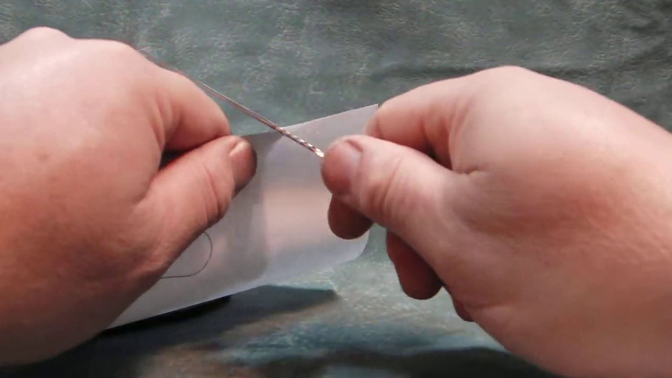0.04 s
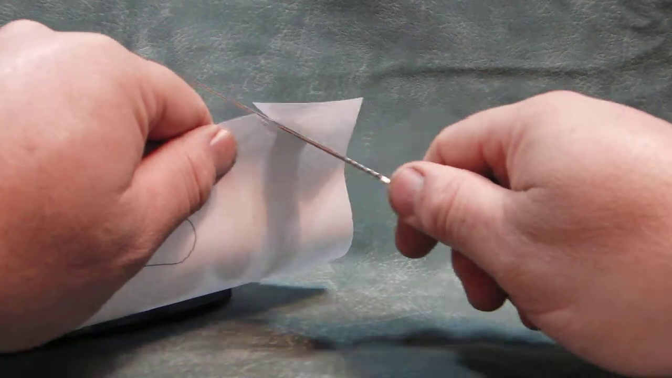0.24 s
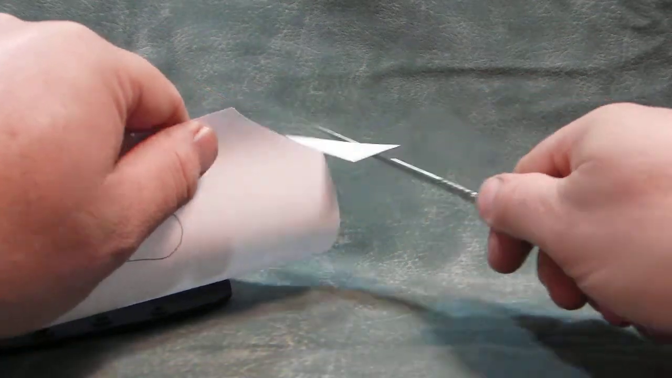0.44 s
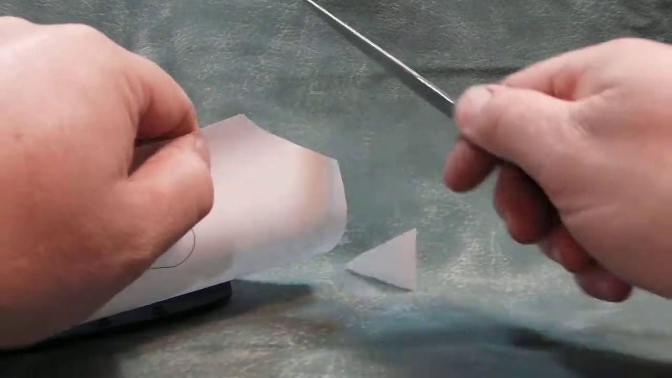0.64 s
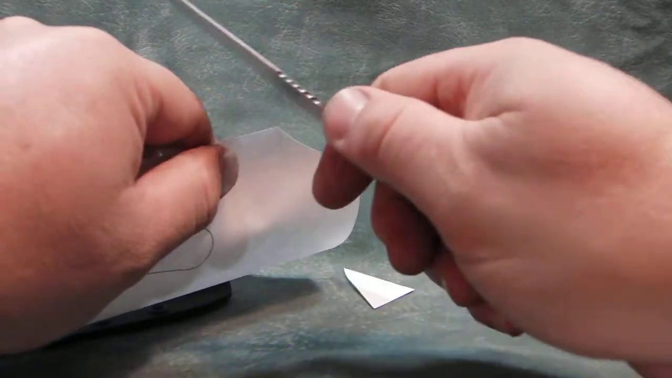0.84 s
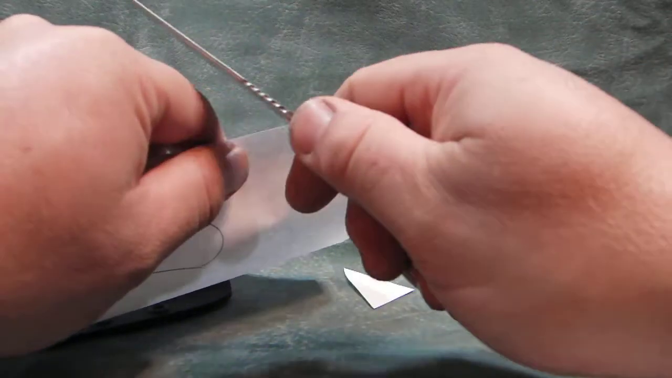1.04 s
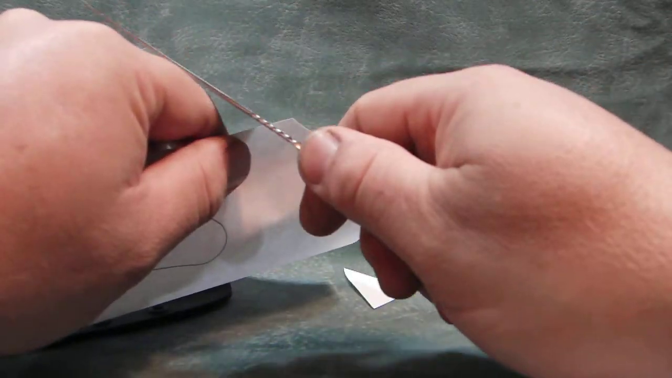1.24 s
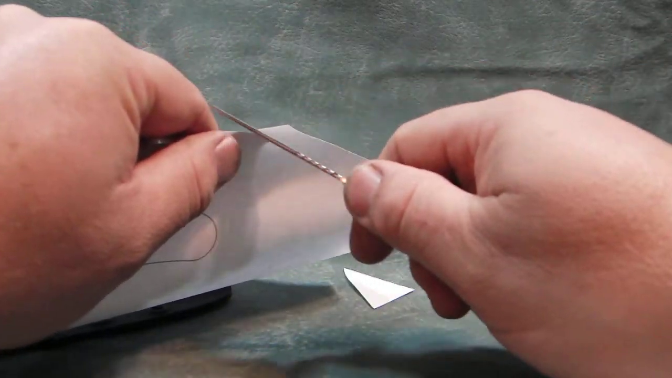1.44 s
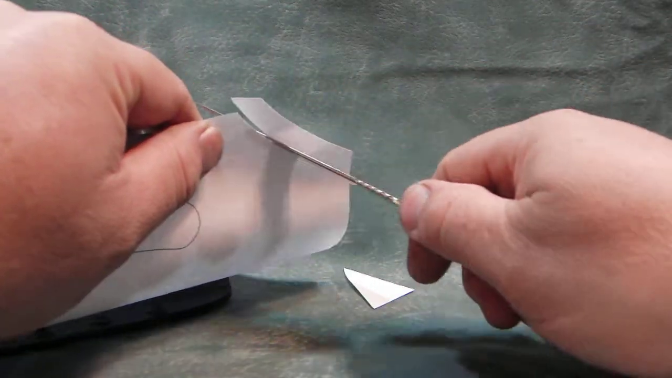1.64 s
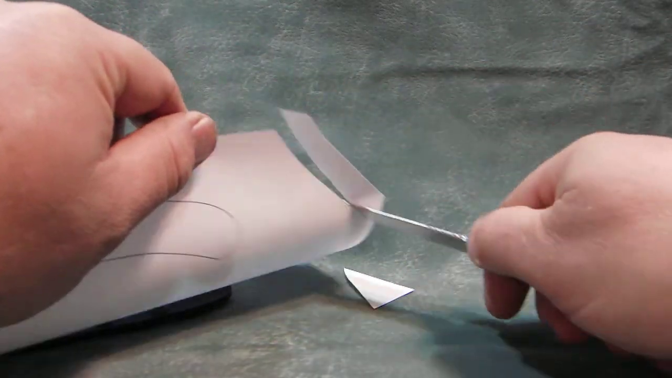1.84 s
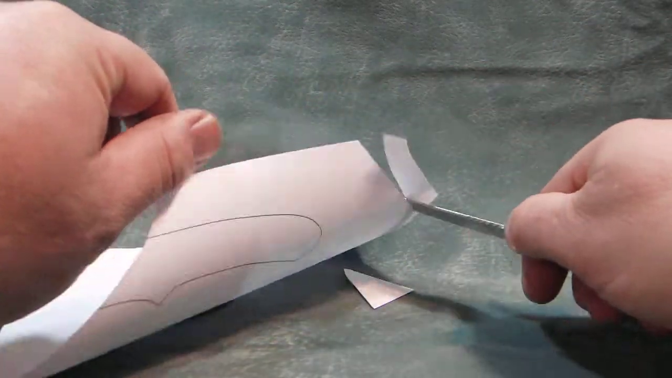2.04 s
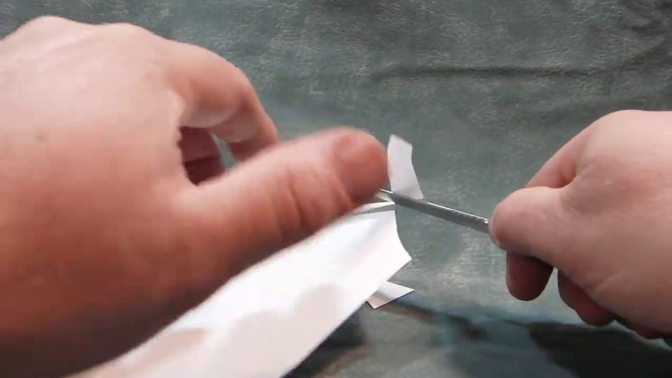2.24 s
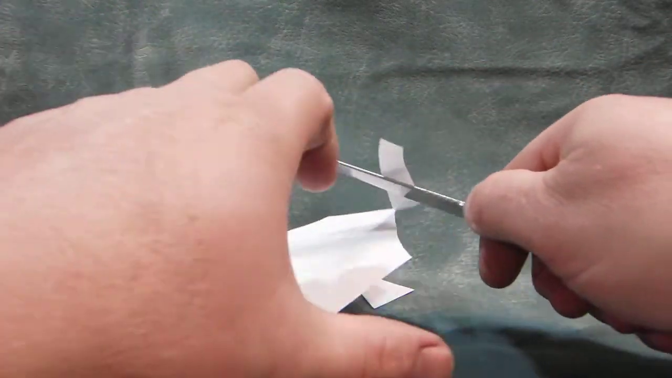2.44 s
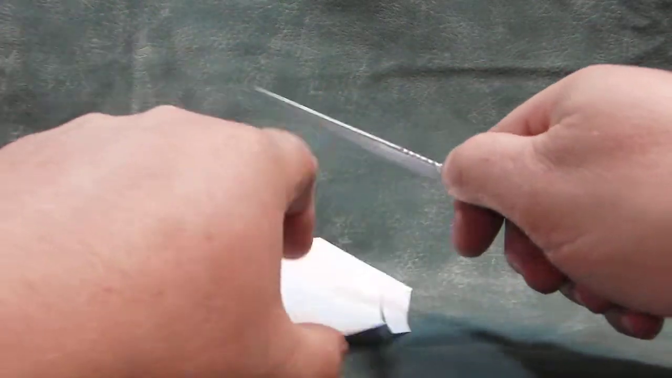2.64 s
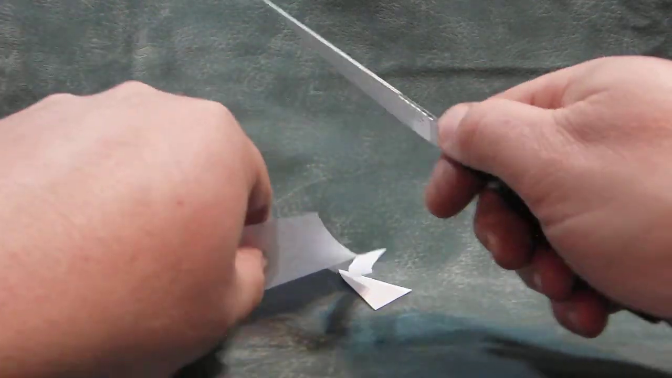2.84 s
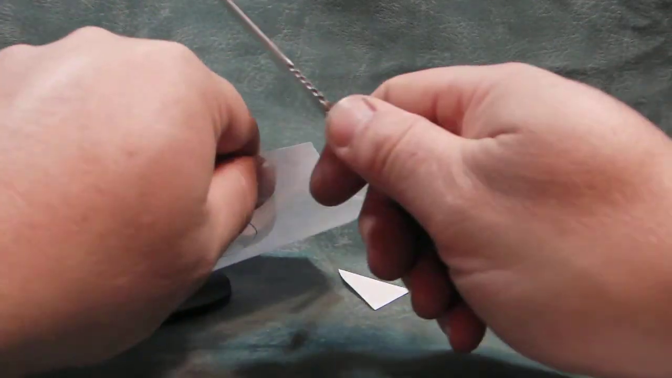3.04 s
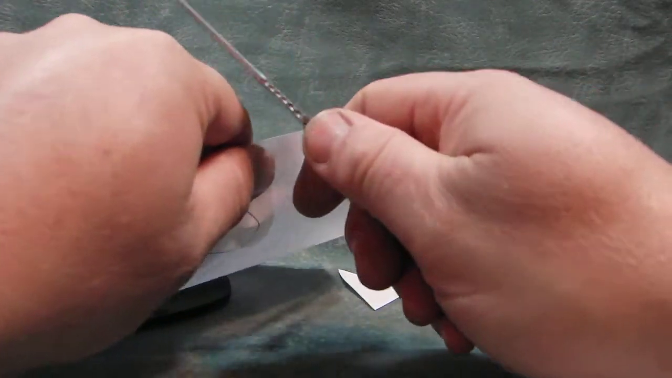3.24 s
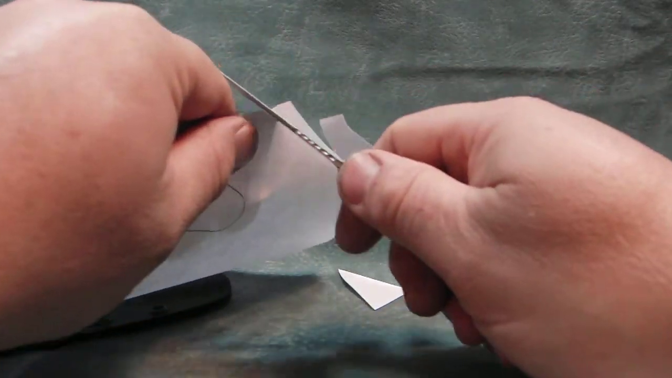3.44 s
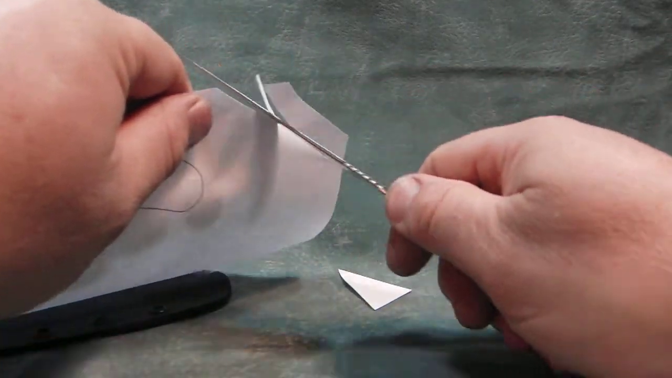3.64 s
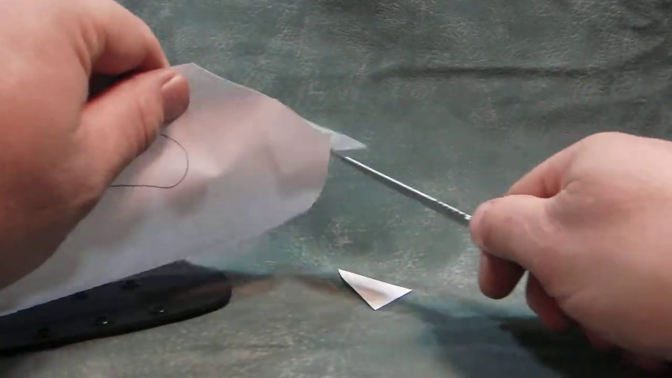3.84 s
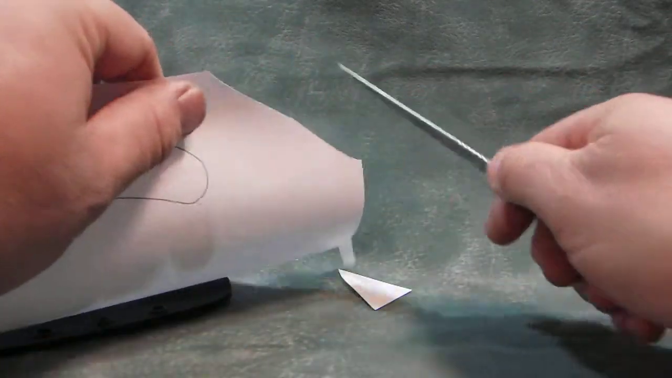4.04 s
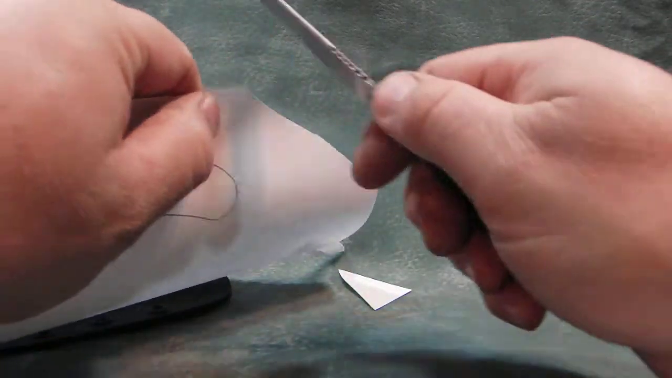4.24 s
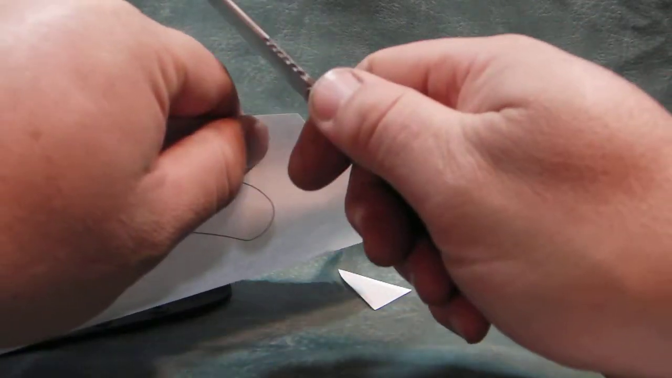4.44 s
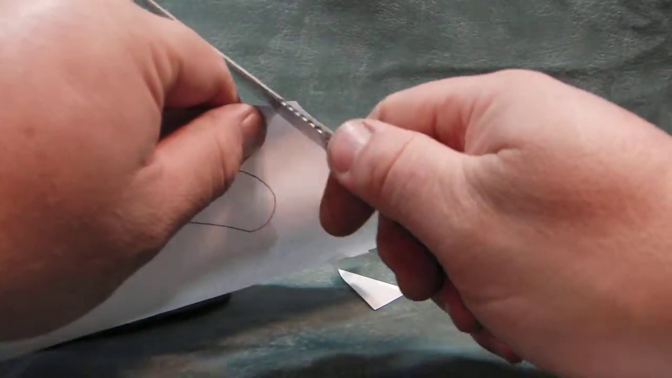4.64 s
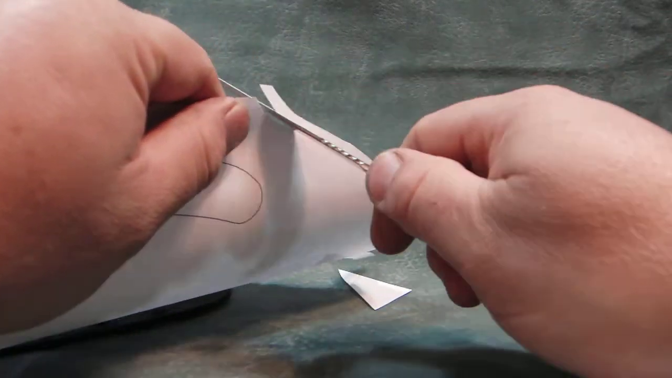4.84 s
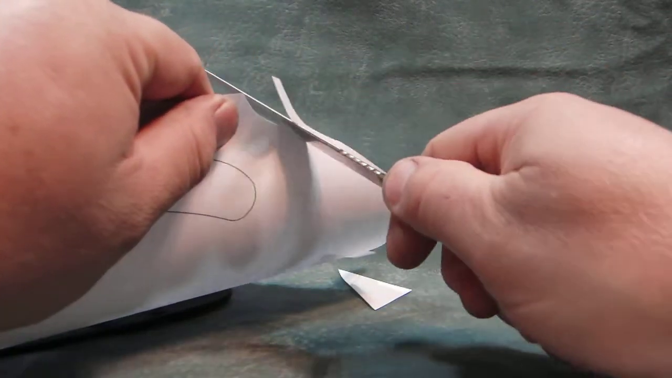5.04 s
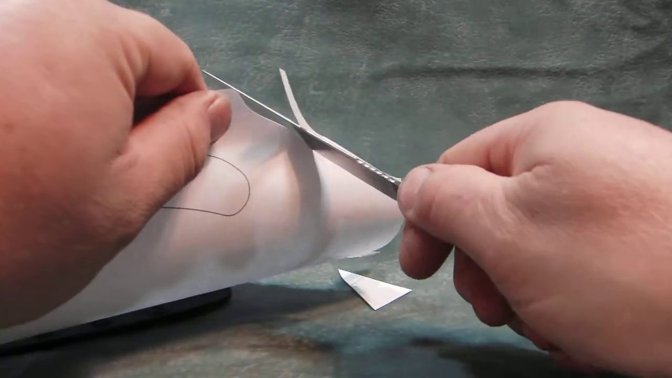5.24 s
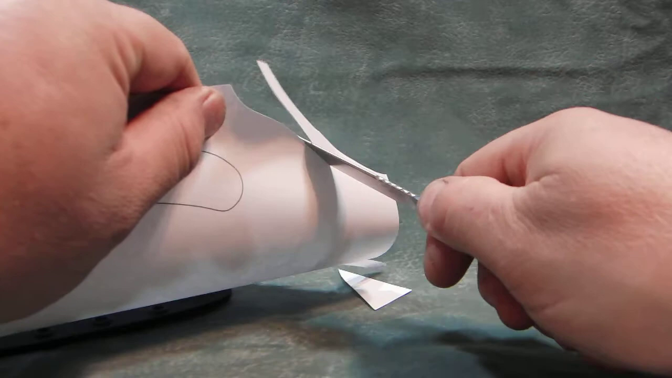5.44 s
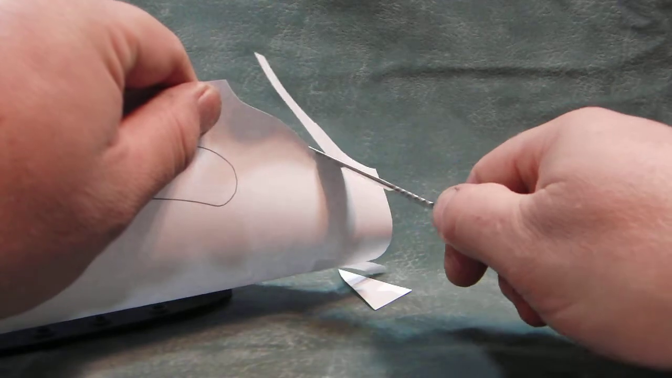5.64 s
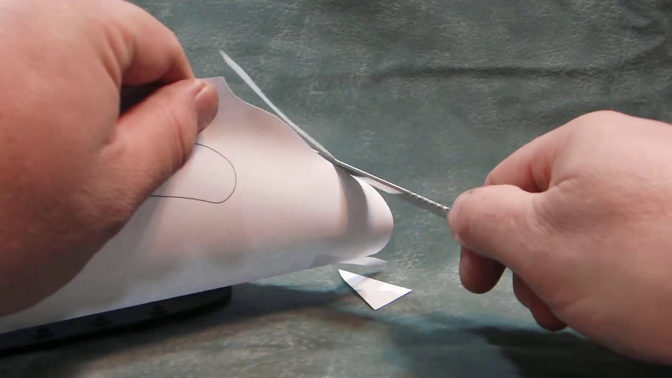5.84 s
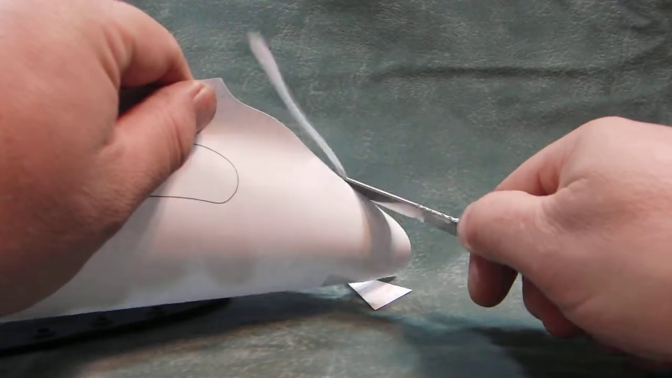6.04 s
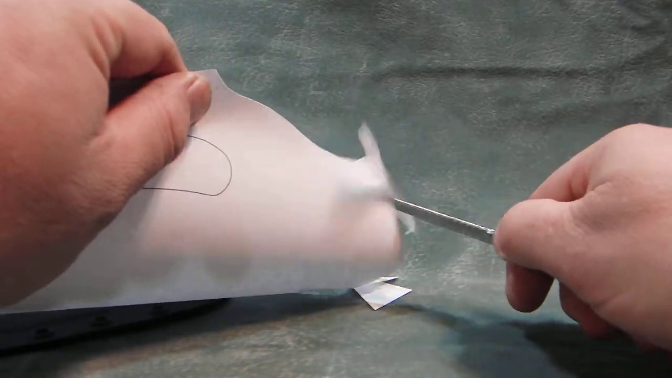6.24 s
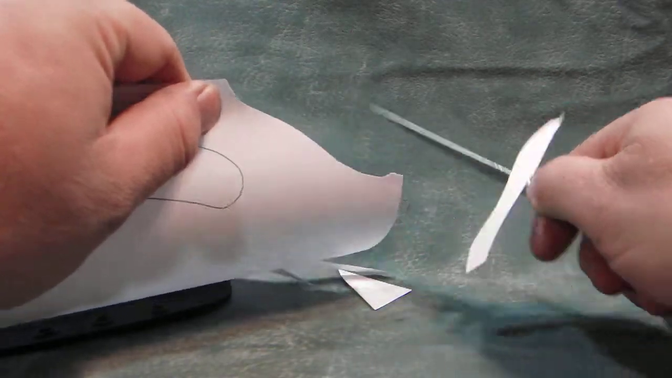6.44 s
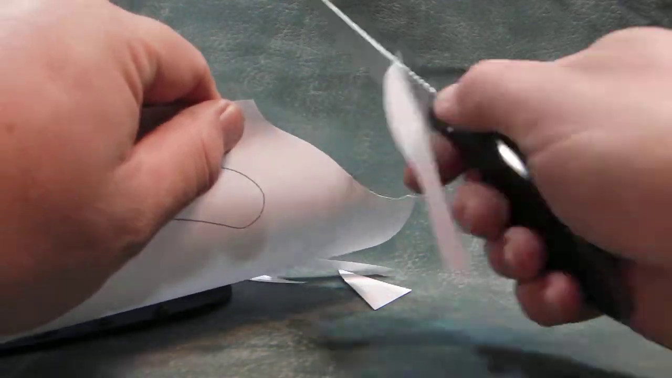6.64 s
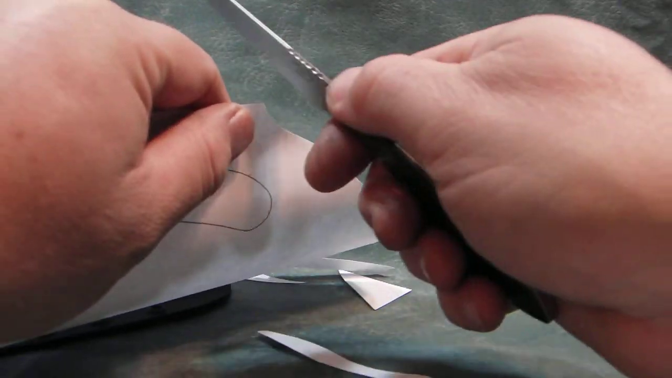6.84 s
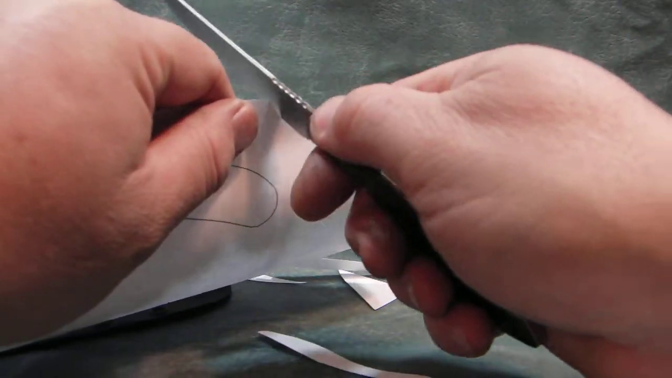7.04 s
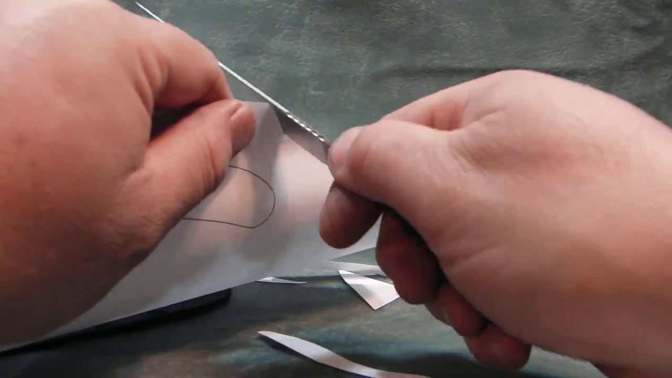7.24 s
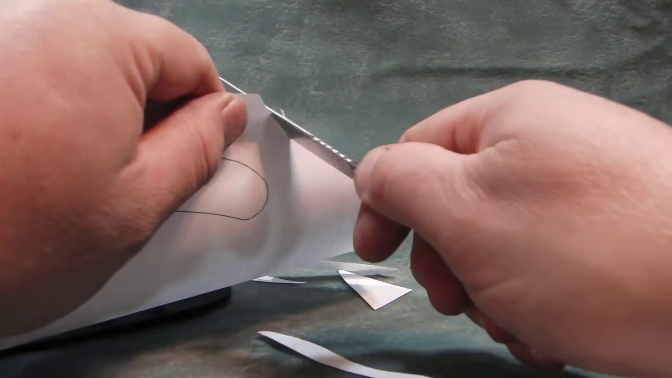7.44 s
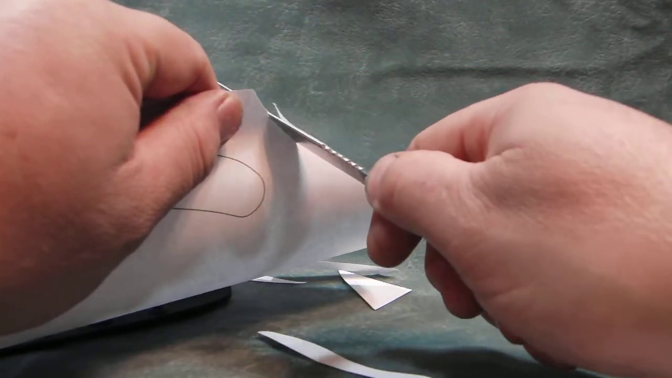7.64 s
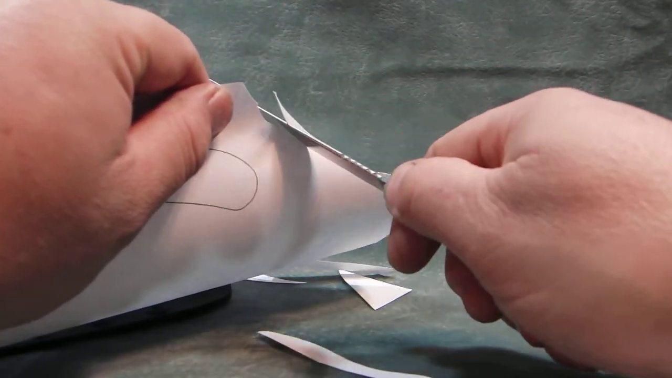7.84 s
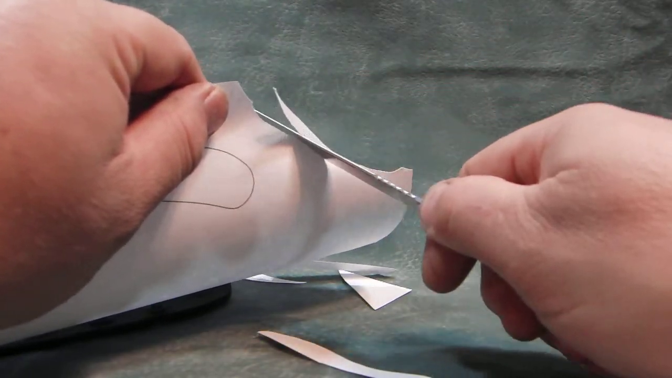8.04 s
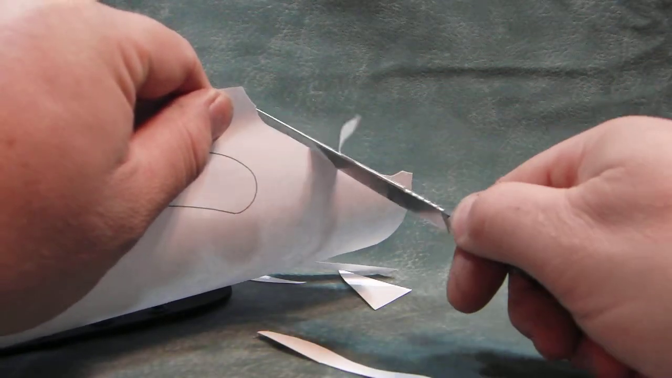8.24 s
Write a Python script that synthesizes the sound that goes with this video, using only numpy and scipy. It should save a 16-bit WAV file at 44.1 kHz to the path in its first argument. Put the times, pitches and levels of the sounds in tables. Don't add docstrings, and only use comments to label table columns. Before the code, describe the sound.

Close, dry paper cutting: fluttering, tearing swishes of a knife through a sheet, sharp fibre ticks, soft handling rustle, faint room hiss.

```python
import sys
import numpy as np
from scipy import signal
from scipy.fft import rfft, irfft, next_fast_len
from scipy.io import wavfile

SR = 44100
rng = np.random.default_rng(int(sys.argv[2]) if len(sys.argv) > 2 else 0)


def elevation(decibels):
    levels = np.asarray(decibels, float)
    return 10 ** (levels / 20)


def master(y):
    cut = np.clip(np.atleast_2d(y).T, -1, 1)
    pcm = np.round(cut * 32767)
    wavfile.write(sys.argv[1], SR, pcm.astype(np.int16))


N = 366471

ZONE_TOPS_HZ = [280, 1300, 2700, 5000, 7860]


def paper():
    cut = zone_gains(pushes(), edge_s=0.0013)
    rub = zone_gains(handling(), edge_s=0.0044)
    flutter = rms_one(elevation(0.68 * drift(150) + 0.65 * drift(24) + 0.14 * drift(4.5)))
    clumps = rms_one(elevation(1.1 * drift(43)))
    fibres = crackle(per_s=3500, spread_db=4.0, smooth=1.15)
    drive = np.where(cut[2] > rub[2], flutter, clumps) * fibres
    return elevation(.8) * sheet(cut + rub, drive, patchy_db=1.6, patch_rate=5.5)


def pushes():
    # [t/s, pressure as level/dB, slackness of sheet/dB, steepness of blade/dB]
    corner_cut = [
        [(0.0, -28, -19, -10), (0.132, -26.5, -11, -4.5), (0.342, -27.5, -8.5, 2)],
    ]
    strip_cut = [
        [(1.253, -45, -8, -5), (1.275, -42, -3.5, -12)],
        [(1.276, -31.5, -6.5, -2), (1.384, -32, -10, -5.5), (1.432, -30, -10, -2.5),
         (1.679, -24.5, -11.5, -6.5), (1.768, -20, -10.5, -7.5)],
    ]
    quick_cut = [
        [(3.306, -33.5, 0, -6.5), (3.37, -36, -6, -2.5), (3.502, -33.5, 0, 2.5), (3.66, -28, -3.5, 1.5)],
        [(3.745, -27.5, 4.5, 6), (3.762, -24, -1.5, 2.5), (3.777, -35, 1, -19)],
    ]
    long_cut = [
        [(4.568, -35.5, -7, 0), (4.612, -30.5, -7, 4), (4.704, -32.5, -12, -0.5), (4.819, -29.5, 1.5, 0),
         (4.847, -29.5, -1.5, -1.5), (4.899, -31, -3, -0.5), (4.93, -43.5, 0, 0.5)],
        [(4.931, -36, 1.5, 4), (4.952, -31, 2.5, 2), (4.995, -34, 2, 0.5), (5.008, -27.5, -1, 2),
         (5.035, -29.5, -8, -0.5), (5.087, -34, -4.5, 4), (5.155, -32, -6.5, 1.5)],
        [(5.156, -42, 3, -1), (5.184, -35.5, -2, 1), (5.399, -25, -6, -7), (5.567, -27, -9.5, -7),
         (5.63, -35.5, -8, -7)],
        [(5.631, -31.5, -12.5, -4), (5.739, -23, -5, -8.5), (5.827, -23.5, -7.5, -8.5),
         (5.872, -28.5, -8, -12.5)],
    ]
    tear_out = [
        [(5.987, -25.5, -9, -12.5), (6.02, -25, -7, -10), (6.031, -34, -6, -7), (6.059, -31.5, -2, -5.5),
         (6.105, -34, 5.5, -3.5)],
        [(6.2, -46.5, -11, -1), (6.22, -32, -14, 7.5), (6.24, -35.5, -5, -3)],
    ]
    slow_cut = [
        [(7.033, -49.5, 2, 2), (7.05, -53, 6, -8.5)],
        [(7.057, -48.5, 3, 1.1), (7.1, -48.5, -1, 1), (7.132, -43, -5.5, 1.3)],
        [(7.133, -34.5, -7.5, 1.5), (7.209, -38.5, -7.5, 4), (7.285, -39.5, -8, 6)],
        [(7.286, -38, -9, 8.3), (7.368, -35, -6, 6), (7.408, -40.5, -2, 10.4), (7.452, -36.5, -2.5, 5.3),
         (7.553, -43.5, 1, 8)],
        [(7.56, -47, 6.5, -5), (7.582, -36, -8, 7), (7.628, -41.5, 4, -3)],
        [(7.633, -36, -1, 7), (7.646, -32, -2, 5.5), (7.666, -35.5, -2, 4), (7.68, -31.5, -0.5, 5.5),
         (7.717, -32, -2, 4.5), (7.884, -32, -4, 4), (7.916, -29.5, -6.5, 6), (8.088, -38, 2, 0.5),
         (8.188, -35, 1.5, -1), (8.26, -32, -2, -1.5), (8.31, -35.5, 1, 0.5)],
    ]
    # [t/s, level/dB, slackness/dB, crispness/dB]
    turn_over = [
        [(2.682, -46, 7, -13), (2.715, -58.5, -17, -1)],
        [(2.718, -31.5, -8, -25), (2.76, -49, -4, -28)],
    ]
    # [edge level/dB, hiss re fibres at start/dB, at end/dB]
    strip_colour = [(5, -0.5, -5), (2.5, 0, 3), (2, -0.5, -5), (10, -7, -2.5), (8, 0, -8), (2.5, -2, -9.5),
                    (4.5, -7, -2), (0.5, -4.5, -8.5), (-0.5, -11.5, -10.5), (1, -5, -8.5), (1, -12, -1),
                    (1.5, -0.5, 0), (2.5, -6, -8.5), (8.5, 5, 2), (11, 1.5, 1), (7, 0.5, -1),
                    (-0.5, -9.5, -13.5), (0.5, -15, -8), (-1, -12.5, -10)]
    edge_follows = 0.43
    cuts = corner_cut + strip_cut + turn_over + quick_cut + long_cut + tear_out + slow_cut
    for rows, (edge_db, first_db, last_db) in zip(cuts, strip_colour):
        s, level, slack, steep = np.transpose(rows)
        sheen = np.interp(s, s[[0, -1]], [first_db, last_db])
        yield s, level, slack, edge_db + edge_follows * steep, steep, sheen


def handling():
    # [from t/s, to t/s, from level/dB, to level/dB, crispness/dB]
    rubs = [(0.341, 0.4, -36.5, -52, -7), (0.403, 0.486, -43, -51.5, 1.5), (.687, 0.854, -46, -60, 2),
            (1.769, 1.912, -36.5, -43.5, 6), (1.916, 1.97, -42.5, -54, 1.5),
            (1.975, 2.003, -40.5, -48, 3.5), (2.003, 2.028, -57, -57, -8), (2.03, 2.08, -48, -40, 3.5),
            (2.084, 2.157, -41, -58, -13), (0.528, 0.57, -45.5, -47.5, -3), (.657, 0.685, -40.5, -40, -1.5),
            (2.133, 2.42, -66, -64.5, 5.5), (2.515, 2.55, -54.5, -57, 13), (2.555, 2.686, -60.5, -55.5, 8),
            (2.74, 2.995, -50.5, -51.5, 4.5), (3.168, 3.305, -55, -59, 3.5), (3.665, 3.69, -39.5, -51, 8.5),
            (3.69, 3.743, -45.5, -40.5, 12), (3.782, 3.85, -37, -54, -1), (3.838, 3.936, -52, -58.5, 8.5),
            (3.956, 4.041, -44.5, -52.5, 1), (4.062, 4.128, -44.5, -52.5, -1), (4.132, 4.484, -54, -52, 1),
            (4.49, 4.564, -51, -75, -4), (5.87, 5.95, -50, -52, -0.5), (6.11, 6.196, -46, -50, 5),
            (6.244, 6.633, -46.5, -65, 4)]
    # [peak t/s, peak level/dB, rise/s, fall/s, crispness/dB]
    rustles = [
        (.53, -50, 0.19, 0.12, 0),
        (0.657, -46, 0.089, 0.18, -0.5),
        (1.007, -54.5, 0.33, 0.43, 2),
        (2.49, -66, 0.091, 0.12, 23),
        (2.915, -46, 0.13, 0.16, 6.5),
        (3.075, -47.5, .075, 0.084, 1.5),
        (5.98, -29, .002, 0.007, -12),
        (6.32, -47, 0.17, 0.13, 5.5),
        (7.03, -56, 1, 0.0034, -4),
    ]
    depth_db = 24.5
    shapes = [([a, b], [in_db, out_db], crisp) for a, b, in_db, out_db, crisp in rubs]
    for s, db, rise, fall, crisp in rustles:
        shapes.append(([s - rise, s, s + fall], [db - depth_db, db, db - depth_db], crisp))
    for s, level, crisp in shapes:
        belly_db, edge_db, fibre_db, sheen_db = -3.5, -3.5 + 0.57 * crisp, -9 + crisp, -5
        yield s, np.array(level), belly_db, edge_db, fibre_db, sheen_db


def zone_gains(events, edge_s):
    lows_db = -23.5
    t, out = np.arange(N) / SR, np.zeros((6, N))
    for s, main, belly, edge, fibre, sheen in events:
        inside = slice(max(0, int((s[0] - edge_s) * SR)), int((s[-1] + edge_s) * SR))
        gate = np.clip(np.minimum(t[inside] - s[0], s[-1] - t[inside]) / edge_s + 1, 0, 1)
        zones_db = [lows_db + (belly + edge) / 2, belly, 0, edge, fibre, fibre + sheen]
        for k, rel in enumerate(zones_db):
            gain = gate * elevation(np.interp(t[inside], s, main + rel))
            out[k, inside] = np.maximum(out[k, inside], gain)
    return out


def crackle(per_s, spread_db, smooth):
    top_smoothing = 1.3
    sizes = elevation(spread_db * np.minimum(rng.exponential(1, N), 5)) * rng.choice([-1, 1], N)
    born = rng.random(N) < per_s / SR
    clicks = rms_one(sizes * born) * [[1], [-1]]
    hiss = rng.standard_normal((2, N))
    return np.r_[clicks + smooth * hiss, clicks + (smooth + top_smoothing) * hiss]


def sheet(gains, drive, patchy_db, patch_rate):
    # [f/Hz, level per Hz/dB]
    radiation = [(30, -26), (100, -29), (300, -13.5), (500, -11), (950, -1), (1400, -7.5), (1900, -0.5),
                 (2500, -9), (3900, -1.5), (5300, -7), (6500, -5), (8500, -15), (12000, -21), (15500, -23)]
    step = 256
    fine, coarse = np.arange(N), np.arange(N // step + 1) * step
    out, power = np.zeros((6, N)), np.zeros((6, len(coarse)))
    edges = np.r_[20 * 2 ** np.arange(0, 4, .5), 320 * 2 ** np.arange(0, 2, .2),
                  1280 * 2 ** np.arange(0, 2, .1), np.arange(5120, 16400, 450)]
    for k, (low, high) in enumerate(zip(edges, edges[1:])):
        hz = np.sqrt(low * high)
        patches_db = patchy_db * (1 if 600 < hz else .5) * drift(patch_rate, step)
        gain = elevation(at_hz(radiation, hz) + patches_db + bowing(hz, coarse / SR))
        zone = np.searchsorted(ZONE_TOPS_HZ, hz)
        power[zone] += gain ** 2 * (high - low)
        source = drive[k % 2 + 2 * (zone >= 4)]
        out[zone] += np.interp(fine, coarse, gain) * band(source, low, high)
    steady = [z / np.interp(fine, coarse, np.sqrt(p)) for z, p in zip(out, power)]
    return sum(g * rms_one(z) for g, z in zip(gains, steady))


def bowing(hz, t):
    # [from t/s, to t/s, from f/Hz, to f/Hz]
    ringing = [(0, 0.34, 2060, 2400), (0, 0.31, 4340, 4430), (1.2, .4, 7050, 7000), (1.3, 1.78, 3800, 3840),
               (1.3, 2.2, 3080, 2930), (7.12, 7.36, 8500, 7950), (-0.3, 1.54, 9900, 9800),
               (1.45, 1.64, 13000, 13100), (-3, 3.1, 10500, 12000), (0.5, 3.4, 2900, 3150),
               (3.403, 3.62, 1220, 1170), (3.547, 3.8, 3090, 3160), (3, 3.788, 4800, 4500),
               (5, 4.795, 2200, 1350), (4.697, 5.4, 6900, 6640), (4.5, 5.1, 12900, 13800),
               (5, 5.05, 4650, 4460), (5.5, 6.2, 9950, 10600), (5.45, 6.4, 3500, 3500),
               (2, 2.55, 6900, 7000), (5.5, 5.9, 1700, 1810), (3, 5.803, 5440, 5330),
               (4.5, 5.85, 12400, 12000), (4.5, 5.9, 14500, 14000), (4.57, 4.72, 10500, 9000),
               (5.2, 4.7, 9300, 8590), (5.5, 5.9, 2950, 2900), (.18, 0.22, 9000, 9000),
               (0.5, 0.16, 10600, 11000), (1.5, 1.48, 8000, 8900), (4, 3.55, 10200, 10600),
               (8.5, 8.03, 4200, 4350), (5.5, 7.35, 7740, 7400), (7, 7.4, 3900, 3900),
               (1, 1.58, 4550, 4500), (1.5, 2.5, 3600, 3460), (3, 3.45, 330, 320), (7.1, 7.5, 310, 200),
               (7.9, 8.2, 320, 230), (5, 5.3, 1000, 1030), (1.25, 1.45, 5300, 4700), (2.5, 3.4, 2300, 2300),
               (7, 7.5, 1830, 1800), (4.57, 4.7, 4100, 3870), (6.5, 7.3, 11500, 11700),
               (7, 7.275, 3160, 3200), (7.087, 7.31, 3820, 3930), (7.5, 8.31, 6570, 6560),
               (6.5, 8.01, 1020, 1600), (6.5, 8.1, 13200, 13100), (7.5, 8.05, 10900, 10100)]
    # [from t/s, to t/s, from f/Hz, to f/Hz]
    cancelling = [(0, .22, 6800, 7200), (.25, .36, 8300, 8200), (0, .08, 13500, 13000),
                  (1.25, 1.8, 7600, 6600), (1.25, 1.36, 6400, 6400), (1.25, 1.4, 12200, 12000),
                  (3.3, 3.5, 8400, 8400), (3.45, 3.7, 1700, 1900), (4.55, 4.75, 5700, 5900),
                  (4.55, 4.66, 7200, 7200), (4.6, 4.88, 13500, 11300), (4.85, 5.3, 11000, 12500),
                  (5.3, 5.45, 12800, 13300), (4.85, 5.2, 9200, 9450), (5.1, 5.35, 10500, 10000),
                  (5.3, 5.85, 7200, 9200), (5.7, 6.12, 8300, 8400), (5.45, 5.9, 6500, 6700),
                  (5.9, 6.12, 6000, 6100), (4.75, 5.0, 3850, 3800), (4.7, 5.05, 3100, 2900),
                  (5.05, 5.3, 4500, 4950), (4.8, 5.05, 2200, 2200), (4.55, 4.7, 1300, 900),
                  (5.75, 5.95, 4200, 4400), (7.05, 7.3, 7200, 5900), (7.15, 7.3, 10500, 10200),
                  (7.55, 8.05, 9200, 8900), (8.03, 8.2, 9000, 9700), (8.15, 8.35, 10300, 10000),
                  (7.55, 8.1, 11300, 11300), (7.5, 7.65, 13200, 13300), (7.7, 8.1, 14000, 15200),
                  (7.05, 7.3, 14000, 14200), (7.3, 8.35, 2700, 3050), (7.45, 8.1, 3600, 3650),
                  (7.05, 7.3, 950, 1050), (7.6, 7.8, 2000, 1900), (4.7, 5.9, 420, 300),
                  (1.25, 1.5, 3000, 3000), (1.82, 2.15, 3100, 2800), (2.62, 2.82, 1450, 1450),
                  (7.6, 7.8, 500, 500), (5.25, 5.6, 14300, 14000)]
    ring_db, cancel_db, fade_s = 8, -9, .05
    lifts = np.repeat([ring_db, cancel_db], [len(ringing), len(cancelling)])
    panels = np.c_[ringing + cancelling, lifts]
    lowest, highest = panels[:, 2:4].min(axis=1), panels[:, 2:4].max(axis=1)
    close = (lowest * .75 - 400 < hz) & (hz < highest * 1.2 + 400) & (hz > ZONE_TOPS_HZ[0])
    start, end, from_hz, to_hz, lift_db = panels[close].T[:, :, None]
    centre = from_hz + (to_hz - from_hz) * np.clip((t - start) / (end - start), 0, 1)
    width_hz = 150 + .03 * centre
    near = np.exp(-((hz - centre) / width_hz) ** 2)
    active = np.clip(np.minimum(t - start, end - t) / fade_s + .5, 0, 1)
    return np.sum(lift_db * near * active, axis=0)


def snaps():
    # [t/s, peak level/dB, ring f/Hz, thump re peak/dB, crack re peak/dB]
    creases = [(0.394, -32, 4700, -17, -19), (0.3965, -25, 4600, -23, -14), (.419, -31, 1500, -9, -25),
               (.657, -33, 2000, -20, -25), (.68, -28, 4230, -17, -20), (0.525, -37, 4620, -16, -18),
               (1.976, -33, 1940, -11, -22), (2.211, -44, 993, -17, -6), (2.592, -33.5, 990, -29, -17),
               (2.68, -21.5, 3300, -21, -32), (2.718, -19, 2300, -17, -25), (2.7235, -15, 2300, -20, -30),
               (2.731, -22.5, 3550, -23, -30), (2.806, -31.5, 795, -10, -25), (2.484, -39, 10500, -40, -19),
               (2.079, -24, 1970, -21, -17), (2.099, -27, 1500, -15, -30), (2.974, -28.5, 950, -18, -28),
               (3.931, -23.5, 1650, -15, -33), (3.932, -33, 3500, -30, -30), (3.947, -27.5, 1740, -5, -25),
               (4.0424, -19, 3420, -21, -14), (4.0428, -23, 1770, -26, -23), (4.0446, -19, 3620, -35, -20),
               (4.0448, -8, 1050, -27, -25), (4.409, -20, 1690, -15, -19), (6.249, -32, 1980, -1.5, -23)]
    # [t/s, peak level/dB, ring f/Hz, crack re peak/dB]
    catches = [(0.282, -12.5, 4160, -19), (3.75, -16, 4600, -12), (5.926, -46, 6500, 0),
               (4.057, -27, 1700, -12), (.312, -9, 3300, -19), (1.73, -9, 2700, -22),
               (5.904, -24.5, 2000, -13), (5.948, -16, 1800, -17), (5.954, -8.5, 3480, -15),
               (5.9595, -7.5, 1840, -16), (5.966, -9, 1870, -13), (5.972, -10, 1900, -17),
               (5.976, -10, 2000, -25), (5.99, -10, 3700, -24), (7.463, -18.5, 1670, -14),
               (7.644, -13.5, 1450, -14), (6.034, -13, 1900, -13), (6.01, -10, 1900, -18),
               (5.012, -12.5, 1100, -22)]
    # [t/s,
    # peak level/dB, ring f/Hz]
    ticks = [(4.7375, -17, 1310), (4.8947, -14, 1550), (4.9401, -15, 4290), (4.953, -14, 1000),
             (5.0024, -11, 1720), (5.0563, -16.5, 1700), (5.1356, -14, 1040), (5.185, -15, 1940),
             (5.2234, -19.5, 921), (5.2538, -17, 1670), (5.2788, -13, 1960), (5.3182, -10, 1850),
             (5.644, -15, 1840), (5.6784, -10, 3350), (5.7128, -12, 1740), (5.7323, -8, 1960),
             (5.7991, -7, 1760),
             (7.1423, -13, 3900), (7.1984, -16, 4000), (7.3419, -14, 3830), (7.3886, -16, 4300),
                  (7.4453, -17, 1820), (7.5744, -19, 4370), (7.5809, -13, 1030), (7.6376, -15, 1480),
                  (7.6713, -12, 4240), (7.7885, -18, 1560), (7.8048, -17, 1360), (7.8227, -14, 1850),
                  (7.8892, -13.5, 1650), (7.903, -11.5, 4320), (7.96, -15, 1830), (8.0503, -19, 918),
             (5.9965, -7.5, 1830),
        (6.052, -11, 1950),
        (6.0811, -12, 1900),
        (6.1006, -12, 1880),
    ]
    catch_thump_db, tick_db, tick_crack_db, t60_s = -29, -4, -14.5, 0.016
    events = creases + [(s, db, hz, catch_thump_db, crack_db) for s, db, hz, crack_db in catches]
    for s, db, hz in ticks:
        events.append((s, db + tick_db, hz, catch_thump_db, tick_crack_db))

    out, t = np.zeros(N + 2000), np.arange(2000) / SR
    fade = elevation(-60 * t / t60_s)
    jolts = rng.standard_normal((len(events), len(t)))
    cracks = rms_one(band(jolts, 4900, 7400) + 0.32 * band(jolts, 6800, 13800)) * fade ** 1.84
    thump = np.sin(2 * np.pi * 330 * t) * fade ** 0.59
    for (s, peak_db, ring_hz, thump_db, crack_db), jolt, crack in zip(events, jolts, cracks):
        onset = np.minimum(t * ring_hz * 2, 1)
        ring = np.sin(2 * np.pi * ring_hz * t) * fade ** 1.54 * onset
        tail = rms_one(band(jolt, 0.63 * ring_hz, 1.53 * ring_hz)) * fade ** 0.5
        burst = 0.87 * ring + 0.29 * tail + elevation(crack_db + 7.0) * crack + elevation(thump_db + 2.0) * thump
        first = round(s * SR)
        out[first:first + len(t)] += elevation(peak_db) * burst
    return band(out[:N], 150, 20000)


def room(x):
    t60_s, gap_s = .12, .002
    t = np.arange(SR // 4) / SR
    tail = rng.standard_normal(len(t)) * elevation(-60 * t / t60_s) * (t > gap_s)
    return signal.fftconvolve(x, tail / np.sqrt(np.sum(tail ** 2)))[:N]


def room_tone():
    # [f/Hz, level/dB]
    hiss_colour = [(15, -29), (25, 4), (59, -10), (281, 2.5), (482, -1.5), (945, 0), (2010, -9.5),
                   (2700, -7), (3340, -9), (5580, -11.5), (15500, -17.5)]
    # [f/Hz, level/dB]
    hum_lines = [(231.5, -73.5)]
    size = next_fast_len(N)
    colour = elevation(at_hz(hiss_colour, np.fft.rfftfreq(size, 1 / SR) + 1))
    hiss = irfft(rfft(rng.standard_normal(size)) * colour, size)[:N]
    t = np.arange(N) / SR
    hum = sum(elevation(db) * np.sqrt(2) * np.sin(2 * np.pi * hz * t) for hz, db in hum_lines)
    return elevation(-56) * rms_one(hiss) + hum


def rms_one(x):
    return x / np.sqrt(np.mean(x ** 2) + 1e-20)


def band(x, low_hz, high_hz):
    return signal.sosfilt(signal.butter(2, [low_hz, high_hz], "band", fs=SR, output="sos"), x)


def drift(rate, step=1):
    r = np.exp(-2 * np.pi * step * rate / SR)
    noise = rng.standard_normal(N // step + 3001)
    settled = signal.lfilter([1], [1, -2 * r, r * r], noise)[3000:]
    return rms_one(settled)[:N]


def at_hz(points, hz):
    point_hz, point_db = np.transpose(points)
    return np.interp(np.log(hz), np.log(point_hz), point_db)


def scene():
    near = paper() + snaps()
    return (near + elevation(-16) * room(near) + room_tone())[None]


def roll_off(x):
    return signal.sosfilt(signal.butter(12, 16450, fs=SR, output="sos"), x)


def record(dry):
    # [f/Hz, width/Hz]
    notches = [(2705, 364), (4996, 510), (5696, 460), (7860, 790)]
    for hz, width_hz in notches:
        dry = signal.lfilter(*signal.iirnotch(hz, hz / width_hz, fs=SR), dry)
    top_cut = signal.ellip(12, .3, 70, 15700, fs=SR, output="sos")
    mix = signal.sosfilt(top_cut, dry)
    return roll_off(mix)


dry = scene()
out = record(dry)
master(out)
```